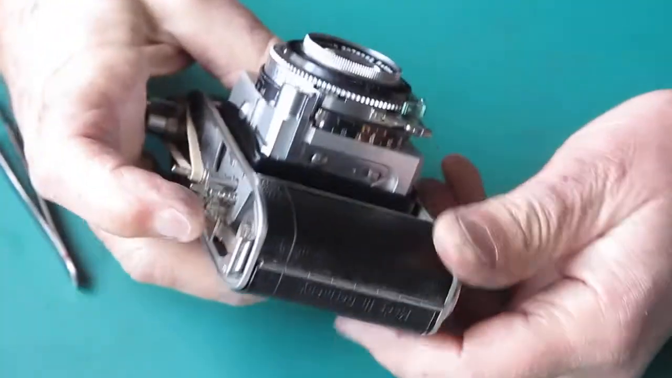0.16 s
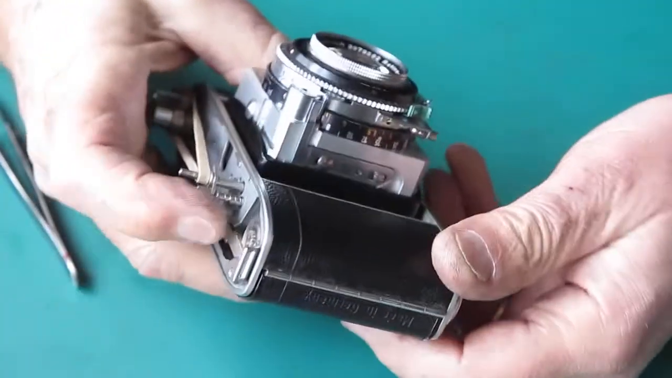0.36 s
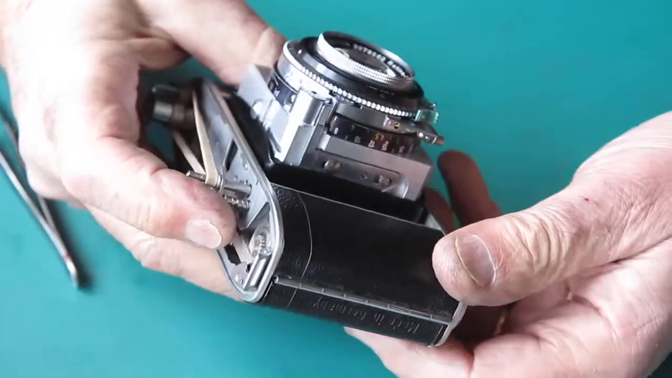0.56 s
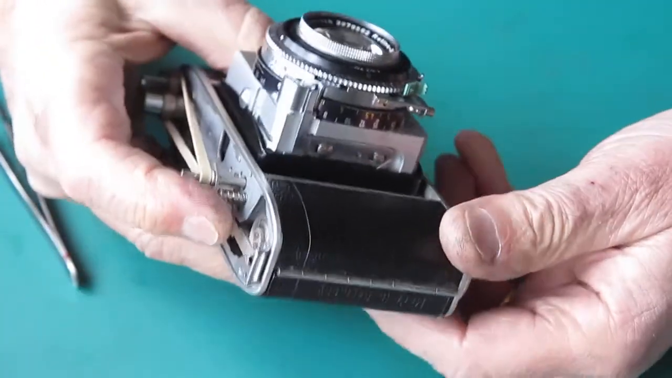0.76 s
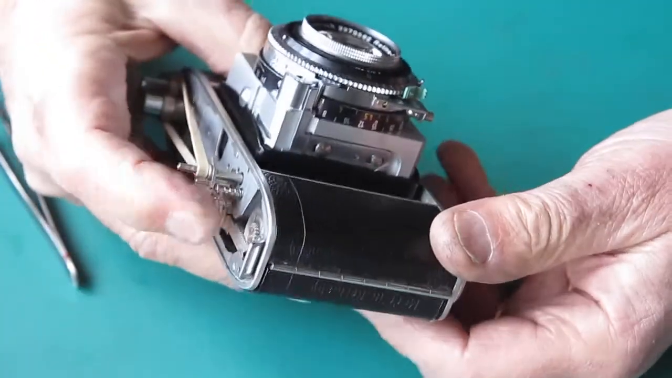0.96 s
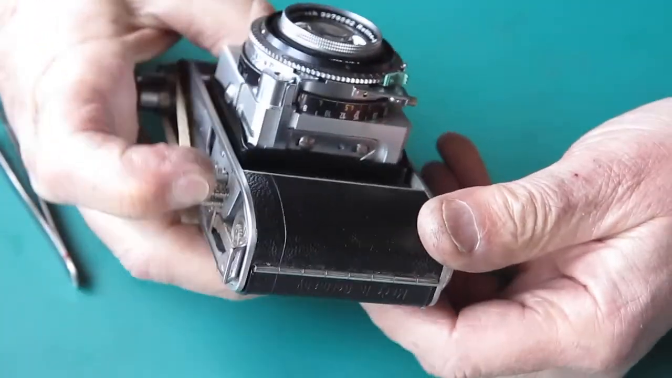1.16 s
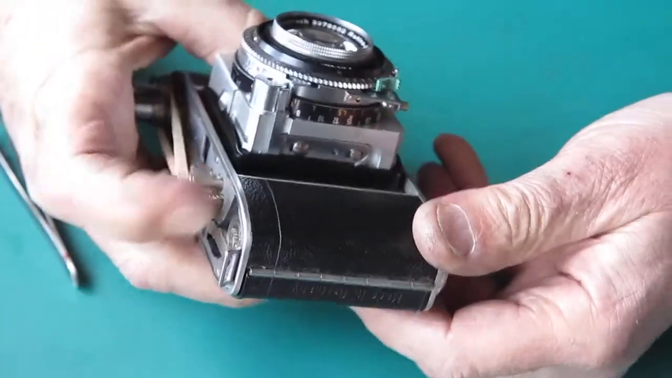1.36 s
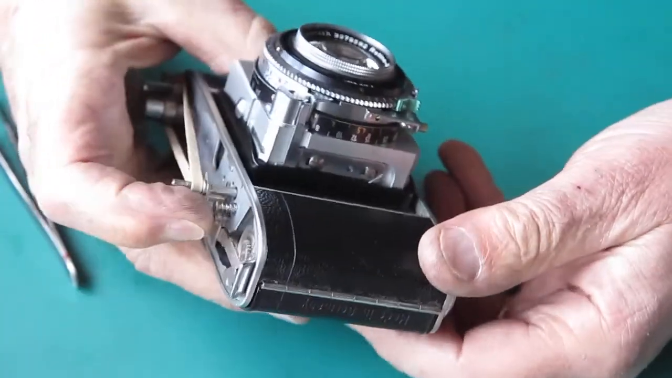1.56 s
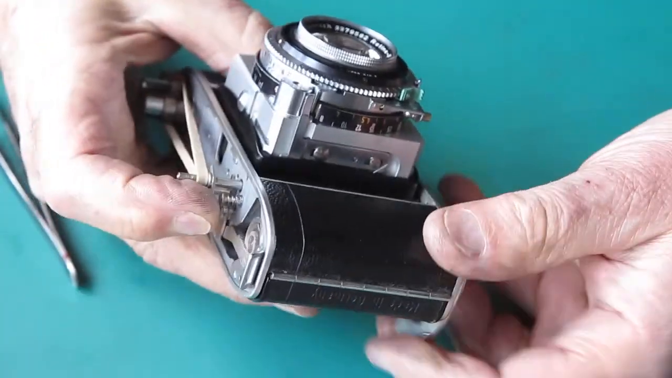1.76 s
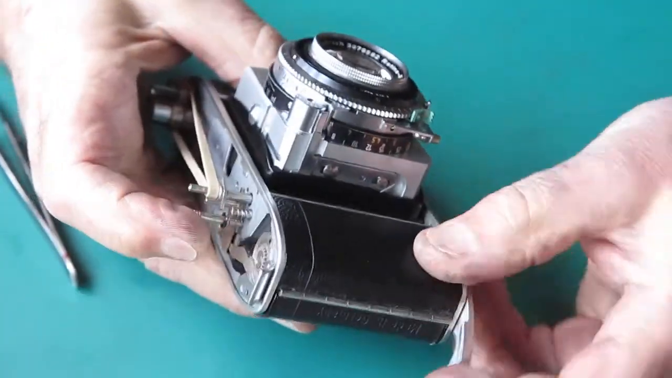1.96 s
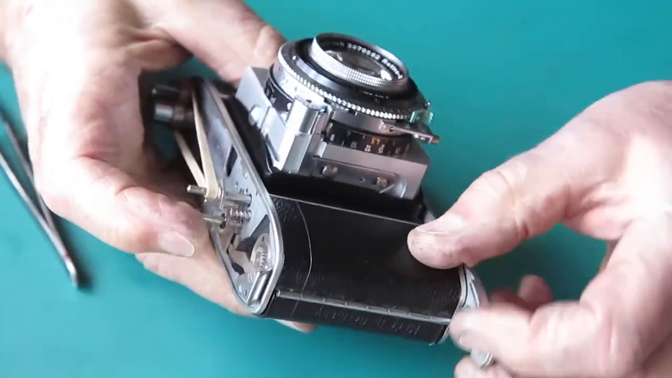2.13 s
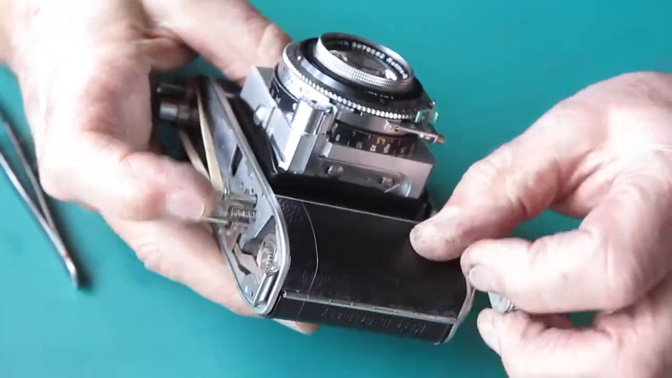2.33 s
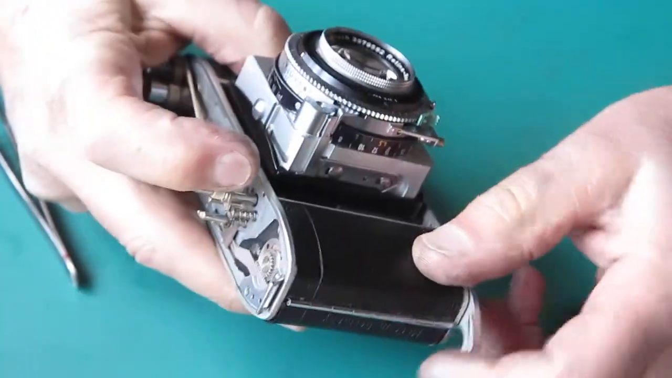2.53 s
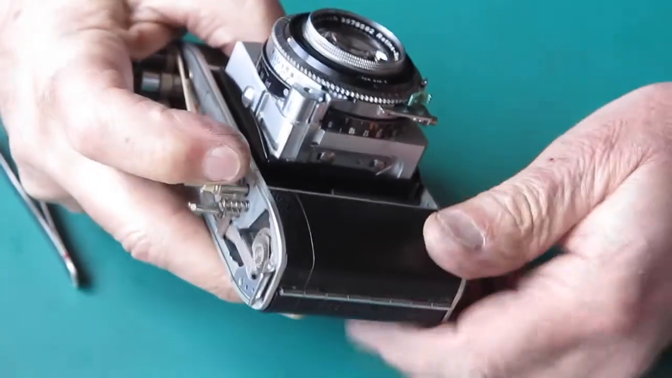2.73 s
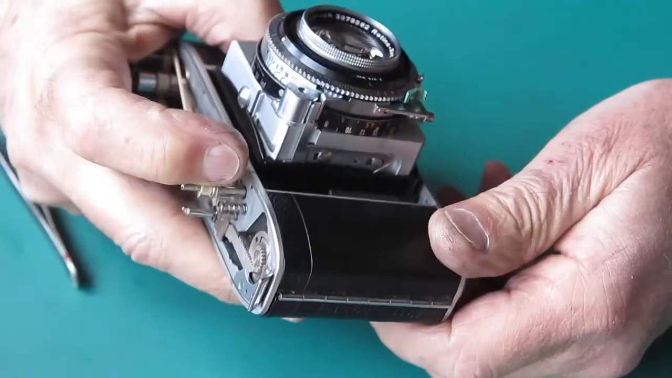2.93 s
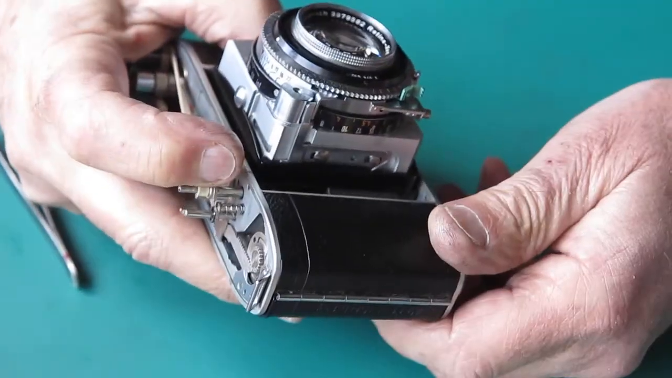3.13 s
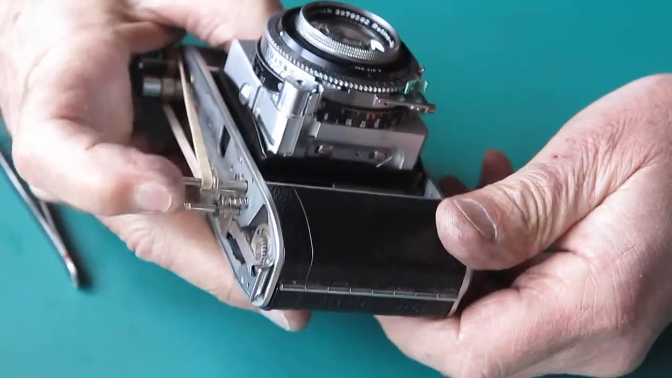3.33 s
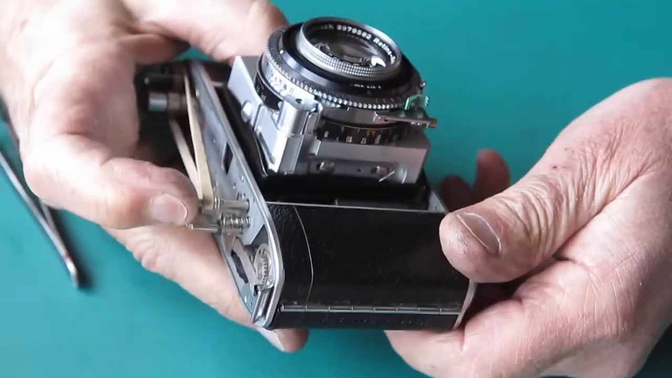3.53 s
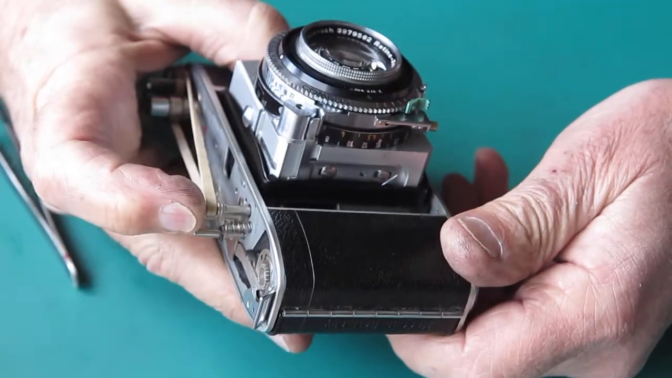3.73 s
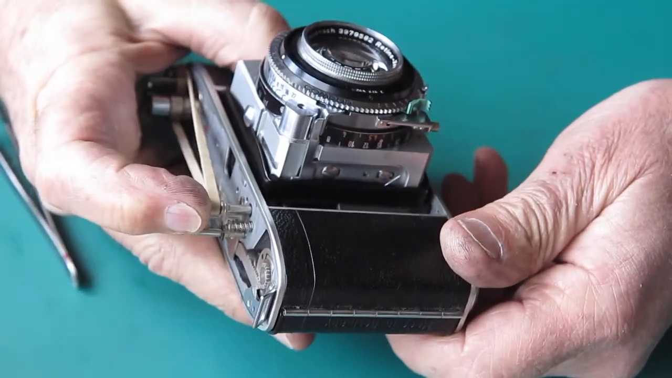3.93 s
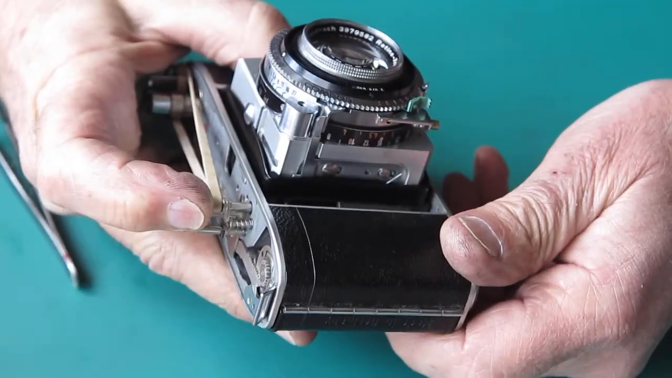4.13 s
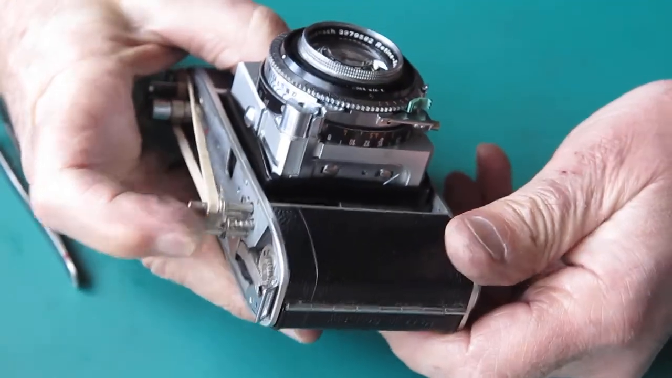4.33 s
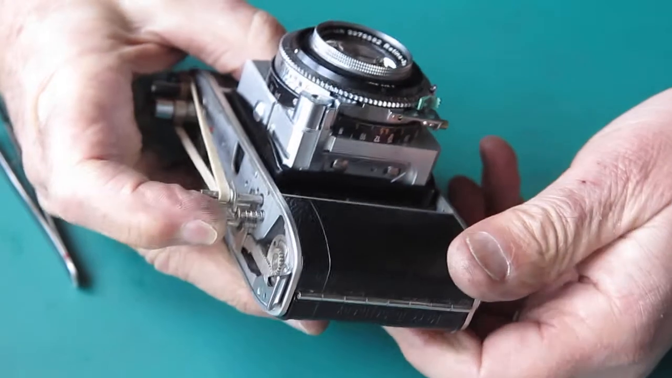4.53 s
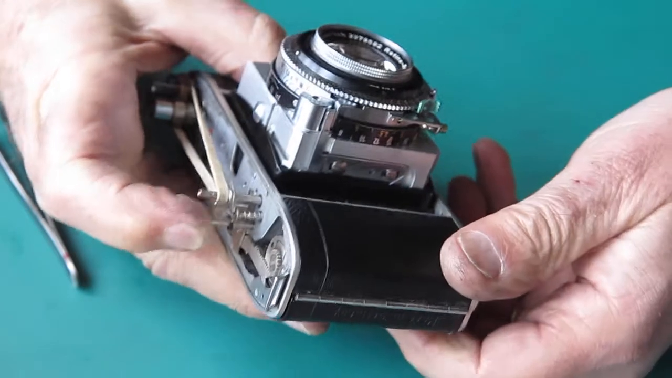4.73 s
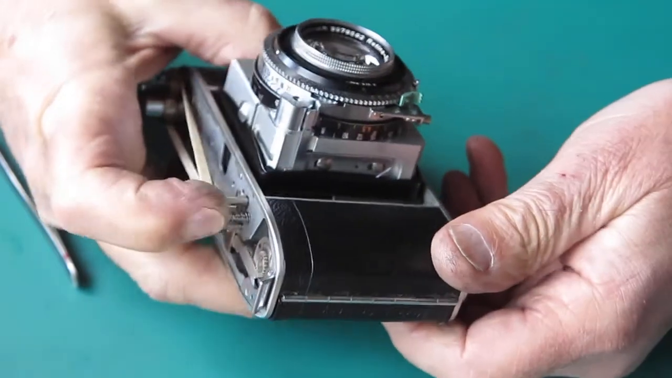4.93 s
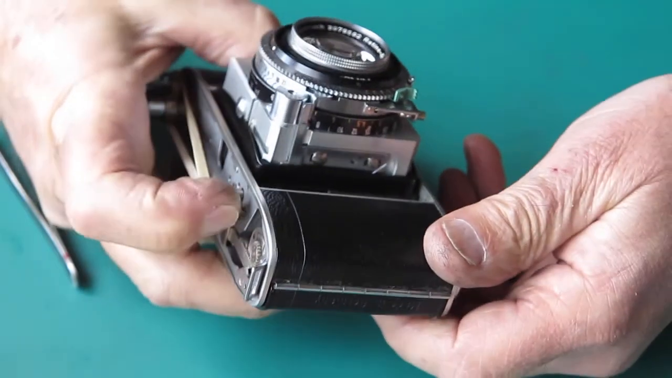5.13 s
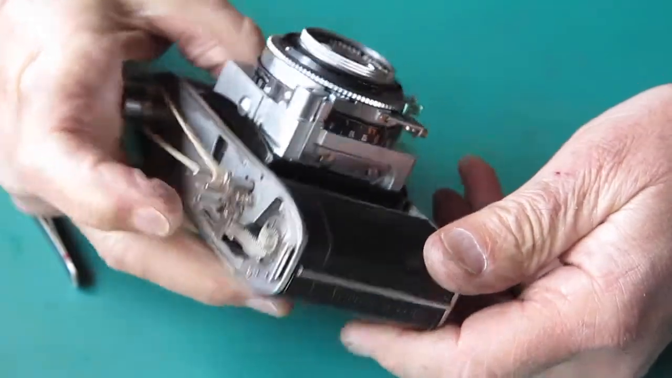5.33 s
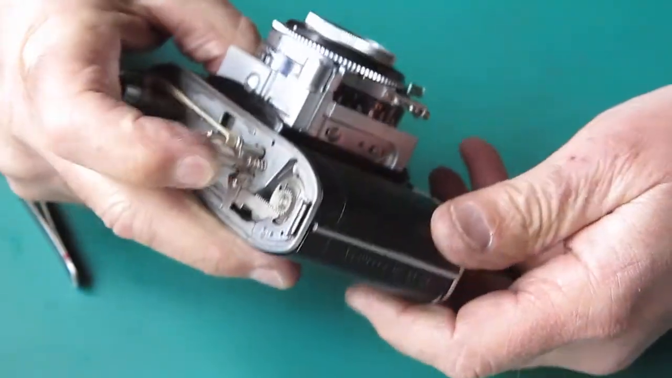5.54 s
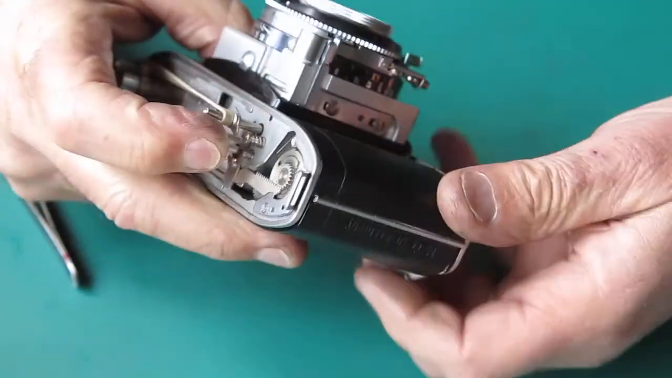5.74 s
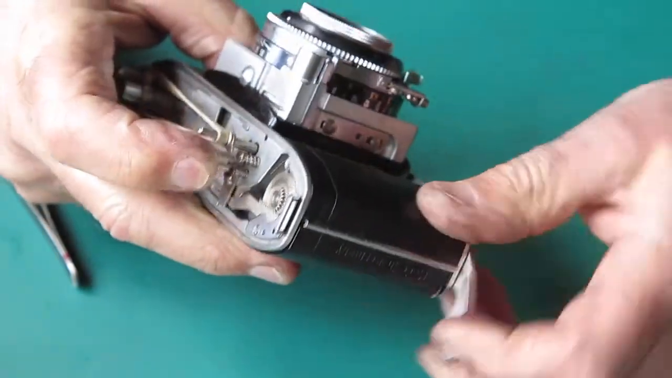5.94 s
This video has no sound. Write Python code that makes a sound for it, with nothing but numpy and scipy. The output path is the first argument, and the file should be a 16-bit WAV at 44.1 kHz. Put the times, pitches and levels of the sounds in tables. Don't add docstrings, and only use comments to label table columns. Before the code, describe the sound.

Small metal camera worked by hand in a quiet workshop: light clicks, a ratcheting lever wind, springy snaps, one sharp shutter release, then winding again.

```python
import sys
import numpy as np
from scipy import signal
from scipy.fft import rfft, irfft
from scipy.io import wavfile
from scipy.ndimage import uniform_filter1d

SR = 44100
rng = np.random.default_rng(int(sys.argv[2]) if len(sys.argv) > 2 else 0)


def output_pcm(signal):
    pcm = np.clip(np.atleast_2d(signal).T, -1, 1) * 32767
    wavfile.write(sys.argv[1], SR, np.round(pcm).astype(np.int16))


def invert_db(x):
    u = np.asarray(x, float) / 20
    return 10 ** u


N = 268791


def shape(table, hz):
    point_hz, value = np.transpose(table)
    return np.interp(np.log(np.maximum(hz, 1)), np.log(point_hz), value)


def level(x, db):
    return x * invert_db(db) / np.sqrt(np.mean(x ** 2))


def coloured(gain, channels=2):
    return irfft(rfft(rng.standard_normal((channels, N))) * gain, N)


def walk(rate_hz):
    hold = int(SR / rate_hz)
    steps = np.repeat(rng.standard_normal(N // hold + 1), hold)
    return 0.75 * uniform_filter1d(uniform_filter1d(steps, hold), hold)[:N]


def add(out, s, sound):
    i = int(s * SR)
    out[:, i:i + sound.shape[1]] += sound[:, :N - i]


def background():
    # (frequency [Hz], density [dB per Hz])
    rumble_spectrum = [(12, -31), (20, -14.5), (139, -3), (213, -9.5), (276, -9.5), (398, -9.5),
                       (467, -12.5), (714, -16), (910, -17), (987, -18), (1050, -17.5), (1160, -19.5),
                       (2500, -39.5), (3250, -56), (5500, -120)]
    # (frequency [Hz], density [dB per Hz])
    hiss_spectrum = [(880, -11.5), (1500, -1.5), (1740, -1.5), (1880, -2.5), (2060, -1.5), (7320, -5),
                     (11700, -20), (14600, -34), (16000, -43.5)]
    # (frequency [Hz], correlation [-1..1])
    likeness = [(30, 0.8), (90, 0.96), (170, 0.4), (300, -0.075), (550, -0.42), (750, -0.24), (1000, -0.19),
                (1500, 0.47), (3000, 0.65)]
    # (frequency [Hz], width [Hz], level [dB], steady share [0..1])
    fan_tones = [(120.6, 4.7, -58.5, 0.18), (148.6, 4.5, -58.5, 0.76), (179.3, 19, -65.5, 0.32),
                 (275, 7.1, -66, 0.3), (968, 4.4, -66.5, 0.94), (1127, 5.9, -75.5, 0.11),
                 (1865, 12, -77.5, 0.93)]
    # (time [s], level [dB])
    swell = [(0, 1), (1.5, -1), (2.3, 0.5), (3.5, 1.8), (3.65, -0.5), (3.8, 3), (3.98, 0.5), (4.0, -3.5),
             (4.35, 0.5), (5.65, 2), (6.1, -0.5)]
    t, f = np.arange(N) / SR, np.fft.rfftfreq(N, 1 / SR)
    swell_db = np.interp(t, *np.transpose(swell))
    alike = np.clip(shape(likeness, f), -.98, .98)
    mid_side_gain = invert_db(shape(rumble_spectrum, f)) * np.sqrt([1 + alike, 1 - alike])
    rumble = 0
    for hz in 25 * 2. ** np.arange(7):
        octaves = np.log2(np.maximum(f, 1) / hz)
        bell = np.cos(np.pi / 2 * np.clip(octaves, -1, 1))
        mid, side = coloured(mid_side_gain * bell)
        flicker_db = 2.0 * walk(4.095) + swell_db * min(500 / hz, 1)
        rumble = rumble + invert_db(flicker_db) * np.array([mid + side, mid - side])
    bed = level(rumble, -50) * invert_db(np.array([[1.8], [-1.8]]))
    for hz, width_hz, db, steady in fan_tones:
        tone, stray = coloured(1 / (1 + ((f - hz) / (width_hz / 2)) ** 2))
        tone = (1 - steady) * level(tone, 0) + steady * 1.38 * np.sin(2 * np.pi * hz * t)
        stray = level(stray, 0)
        hum = np.array([tone + 0.2 * stray, 0.94 * tone - 0.37 * stray])
        bed += level(hum, db) * invert_db(.5 * swell_db)
    hiss = level(coloured(invert_db(shape(hiss_spectrum, f))), -57)
    return bed + hiss


def recorder_gain_db(t):
    # (time [s], lasting drop [dB], short dip [dB], hold before creep [s])
    drops = [
        (2.27, 2.5, 2.5, 0.0099),
        (2.78, 2.5, -1.5, .02),
        (3.988, 8.5, -0.3, 0.54),
    ]
    start_db, creep_db_per_s, dip_return_s = -12, 4.5, 0.55
    gain_db = start_db + creep_db_per_s * t
    for s, db, dip_db, hold_s in drops:
        since_s = np.maximum(t - s, 0)
        gain_db -= (t > s) * (db + dip_db * np.exp(-since_s / dip_return_s))
        gain_db -= creep_db_per_s * np.minimum(since_s, hold_s)
    return gain_db


def soft_contact(out, s, db, hz, t60_ms, width, push_ms, count=12, size=8000):
    t = np.arange(size) / SR
    jitter, phase = rng.standard_normal((2, count, 1))
    spread = np.linspace(-1.2, 1.6, count)[:, None] + 0.077 * jitter
    mode_hz = hz * np.exp(width * spread)
    modes = invert_db(-5 * spread ** 2) * np.sin(2 * np.pi * mode_hz * t + 1.57 * phase)
    decay = np.exp(-np.log(1000) * t / (t60_ms * 0.0018))
    push = np.minimum(t / (push_ms * 0.00036), 1)
    ring = modes.sum(axis=0) * decay * push
    add(out, s, np.tile(ring * invert_db(db + 1.5), (2, 1)))


def rubs():
    # (time [s], peak [dB], pitch [Hz], t60 [ms], mode spread [log ratio])
    slides = [(.255, -55.5, 1493, 70, 0.63), (1.25, -54.5, 1506, 100, 0.56), (2.2585, -31, 960, 26, 0.067),
              (3.249, -50.5, 1617, 95, 0.63), (3.93, -51, 66, 200, 0.22), (4.0, -54, 2300, 220, 0.0093),
              (4.25, -55.5, 1300, 78, 0.34), (4.35, -54, 284, 70, 0.24), (4.94, -56, 4680, 69, .05),
              (5.245, -54.5, 1136, 170, 0.44), (5.334, -57, 1000, 140, 0.32),
              (5.378, -39.5, 498, 31, 0.205)]
    out = np.zeros((2, N))
    for s, db, hz, t60_ms, width in slides:
        soft_contact(out, s, db, hz, t60_ms, width, push_ms=0.11 * t60_ms)
    return out


def echoes(dry, size=22050):
    # (frequency [Hz], t60 [s], level [dB])
    room = [(1000, 0.29, -2.5), (2500, .25, 2.5), (5110, 0.34, -3.5), (7200, 0.27, 3.5), (9940, 0.23, 0),
            (13700, 0.17, -0.5)]
    # (time [s], level [dB])
    walls = [(.004, 10.5), (.010, 1), (.019, -5), (.031, 1), (.040, -0.5), (.06, -1.5)]
    t, f = np.arange(size) / SR, np.fft.rfftfreq(size, 1 / SR)
    clumps_db = np.repeat(rng.standard_normal((2, size // 50)), 50, axis=1)
    grain = rfft(rng.standard_normal((2, size)) * invert_db(clumps_db))
    alike = np.clip(1.1 - f / 6000, 0, .9)
    grain[1] = alike * grain[0] + np.sqrt(1 - alike ** 2) * grain[1]
    echo = 0
    for k, (_, t60_s, db) in enumerate(room):
        share = shape([(hz, j == k) for j, (hz, _, _) in enumerate(room)], f)
        echo = echo + irfft(grain * share, size) * invert_db(db - 60 * t / t60_s)
    onset = np.clip((t - .0015) / 0.01, 0, 1)
    echo = echo * invert_db(np.interp(t, *np.transpose(walls))) * onset
    mono = dry.mean(axis=0, keepdims=True)
    return invert_db(-32) * signal.fftconvolve(mono, echo, axes=1)[:, :N]


def workshop(dry, pattern_s=.03, patterns=5):
    pattern = np.arange(N) // int(pattern_s * SR) % patterns
    return sum(echoes(dry * uniform_filter1d(1. * (pattern == k), size=64)) for k in range(patterns))


def strikes(rows, thud_db, ring_ms, ping_db, size=2048):
    # (frequency [Hz], level [dB], t60 [ms])
    shell = [(863, -1.5, 17.6), (950, -3, 33.7), (1124, 4.5, 10.4), (1300, 7.5, 8.5), (1448, 1, 15),
             (1800, -2, 16), (2100, 0, 11), (2680, -5.5, 31)]
    # (frequency [Hz], level [dB])
    steel = [(1500, -27), (2400, -12.5), (3100, -7), (4500, 1.5), (5600, -2.5), (7000, -1), (10000, -5),
             (14000, -2.5), (18000, -14.5)]
    out, t, f = np.zeros((2, N)), np.arange(size) / SR, np.fft.rfftfreq(size, 1 / SR)
    u = np.maximum(t - .001, 0)
    shell_hz, shell_db, shell_ms = np.transpose(shell)[:, :, None]
    sign = (-1) ** np.arange(len(shell))[:, None]
    apart = np.clip(f / 16000, 0, .6)
    fade = np.exp(-u / (ring_ms * 0.0021)) + 0.71 * np.exp(-u / 0.00051)
    fade *= np.minimum(u / 0.00033, 1)
    for s, db, large_db, bright_db in rows:
        spurts_db = 3.7 * np.repeat(rng.standard_normal(size // 32), 32) * np.minimum(u / 0.0019, 1)
        rattle = rfft(rng.standard_normal((3, size)) * invert_db(spurts_db) * fade)
        rattle /= np.sqrt(uniform_filter1d(np.abs(rattle) ** 2, size=40, axis=1))
        both, *own = rfft(irfft(rattle, size) * np.minimum(u / 0.00004, 1) * np.exp(-u / 0.024))
        tone_db = shape(steel, f) + (large_db + 9) * np.clip((5800 - f) / 1000, 0, 1)
        tone_db += (bright_db + 12.5) * np.clip((f - 7500) / 2500, 0, 1)
        tone_db += ping_db * np.clip((f - 13000) / 1500, 0, 2)
        stereo = np.sqrt(1 - apart ** 2) * both + apart * np.array(own)
        part = irfft(stereo * invert_db(tone_db), size)
        part /= np.sqrt(np.mean(part[:, :size // 16] ** 2))
        uneven, detune = rng.standard_normal((2, len(shell), 1))
        thud = sign * invert_db(shell_db + 2.5 * uneven) * np.sin(2 * np.pi * shell_hz * (1 + 0.034 * detune) * u)
        thud *= np.exp(-np.log(1000) * u / (shell_ms * 0.0009)) * np.minimum(u / 0.0012, 1)
        row_thud_db = thud_db - 0.47 * (db + 31.5) + 0.27 * (large_db + 8)
        add(out, s - .001, invert_db(db + 4.0) * (part + invert_db(row_thud_db + 5.5) * thud.sum(axis=0)))
    return out


def touches():
    # (time [s], peak [dB], larger-part tone near 4 kHz [dB])
    taps = [(0.29, -56, -6), (0.3125, -51.5, -7), (.398, -58, -11), (0.962, -52.5, -6), (1.553, -63, -15),
            (1.67, -57, 0), (2.4747, -55, -9), (3.2476, -51.5, -3), (4.4426, -60, -12), (4.4887, -62.5, -5),
            (4.9496, -64, 8), (5.0508, -53, -2), (5.184, -45.5, -2), (5.3748, -51, -2), (5.4284, -53.5, 23),
            (5.465, -52, -1), (5.534, -47.5, -4), (5.582, -49.5, -14)]
    bright_db = -13
    rows = [(s, db, large_db, bright_db) for s, db, large_db in taps]
    return strikes(rows, thud_db=-17.5, ring_ms=2, ping_db=-7)


def button():
    # (time [s], peak [dB], larger-part tone [dB], brightness [dB])
    hits = [(1.0049, -34, -17, -10), (1.0122, -47, -27, -15), (1.0152, -41.5, -7, -14),
            (1.289, -33, -14, -3), (1.2918, -27, -9.5, -4.5), (1.3635, -35.5, -9, -7.5),
            (1.366, -45, -9, -9), (1.3737, -47, -28, -19), (1.5429, -45.5, -11, -11),
            (3.9848, -18.5, -8, -6.5), (3.9876, -14.5, -9.5, -9), (3.9912, -19.5, -7, -3),
            (3.9943, -23, -12, -7), (4.0017, -42, -9, -7), (4.2528, -44.5, -7.5, -9.5),
            (5.0852, -31, -12, -1), (5.0905, -27, -13, -1.5), (5.096, -36, -13, -3),
            (5.101, -36.5, -10, -6), (5.2, -33, -9, -9), (5.2103, -43, -14, -17)]
    return strikes(hits, thud_db=-18.5, ring_ms=1.62, ping_db=-17)


def rings(size=4096):
    # (time [s], pitch [Hz], peak [dB], t60 [ms])
    lone = [(1.0052, 4660, -35, 27), (1.0052, 7150, -39, 20), (1.0052, 3500, -33, 12),
            (1.0155, 4500, -38, 20), (1.291, 5770, -37, 32), (1.292, 4700, -37, 15), (1.292, 9200, -31, 25),
            (1.3637, 3650, -39, 20), (1.3637, 6940, -43, 25), (2.2648, 4440, -11.5, 14),
            (2.265, 6200, -14, 29), (2.2648, 8410, -17.5, 22), (2.2645, 9900, -12, 40),
            (2.2645, 11000, -22, 25), (2.3, 3200, -45, 18), (2.487, 7100, -26.5, 36), (3.9, 8330, -34, 25),
            (2.5807, 5270, -31, 22), (2.5807, 6100, -34, 25), (2.5815, 8400, -24, 22),
            (2.5804, 9100, -29, 25), (2.6775, 3800, -29, 18), (2.6772, 5600, -34, 20),
            (2.6775, 7010, -30, 15), (2.6775, 8400, -18, 20), (2.7548, 4300, -20, 25),
            (2.7548, 6030, -31, 20), (2.754, 7200, -27, 25), (2.7548, 8400, -20, 25), (2.78, 2760, -19, 14),
            (2.7862, 6090, -22, 70), (2.786, 6730, -25, 30), (2.79, 10400, -26, 37),
            (2.7995, 4170, -31, 34), (3.988, 5200, -15.5, 32), (3.987, 6800, -30, 45),
            (3.988, 11000, -36, 50), (3.985, 8400, -21.5, 20), (3.988, 10600, -27, 30),
            (4.253, 7170, -48, 30), (4, 5100, -46, 25), (5.911, 6900, -37, 30), (5.2, 3300, -31, 15),
            (5.965, 5700, -33, 25), (5.984, 5200, -29, 25), (5.846, 2650, -37.5, 21.3)]
    strike_s = [1.0125, 1.0155, 1.543, 1.795, 1.858, 1.975, 2.118, 2.4885, 2.581, 2.6775, 4.7166, 4.744,
                5.0855, 5.0905, 5.1845, 5.2, 5.582, 5.755, 5.846, 5.911, 5.965, 6.061]
    # (pitch [Hz], peak [dB], t60 [ms])
    strike_modes = [
        [(7200, -47, 12)],
        [(7300, -46, 14)],
        [(6200, -46, 15), (7280, -50, 20), (3200, -44, 12)],
        [(4300, -35, 15), (5250, -41, 15), (2750, -40, 12)],
        [(5040, -33, 22), (7250, -43, 20), (8250, -42, 15)],
        [(3930, -34, 15), (5750, -41, 15), (7250, -45, 20), (11400, -36, 15)],
        [(3900, -43, 15), (7260, -48, 20)],
        [(7000, -38, 18)],
        [(6250, -34, 20), (7250, -36, 22)],
        [(7300, -32, 20)],
        [(7300, -48, 25), (3250, -52, 12), (12000, -43, 10)],
        [(4250, -32, 24), (6160, -35, 20), (7750, -39, 25)],
        [(2730, -42, 13)],
        [(4300, -31, 24), (5540, -33, 20), (7250, -40, 25)],
        [(2800, -47, 15), (7150, -57, 20)],
        [(3880, -40, 19), (5170, -39, 15), (7540, -45, 20)],
        [(6000, -45, 15), (7100, -54, 15)],
        [(7100, -48, 15)],
        [(6540, -36, 20), (5360, -40, 15)],
        [(6300, -27, 25)],
        [(7250, -33, 20), (6000, -36, 15)],
        [(7250, -43, 20), (6250, -42, 15)],
    ]
    out, t = np.zeros((2, N)), np.arange(size) / SR
    modes = list(lone)
    for s, struck in zip(strike_s, strike_modes):
        modes += [(s, *mode) for mode in struck]
    for s, hz, db, t60_ms in modes:
        split, turn = rng.standard_normal(2)
        twin_hz = hz * (1 + 0.009 * split)
        pair = np.sin(2 * np.pi * hz * t) + 0.91 * np.sin(2 * np.pi * twin_hz * t + turn)
        decay = invert_db(db - 60 * t / (t60_ms / 1000))
        add(out, s, np.tile(decay * pair * np.minimum(t / 0.00027, 1), (2, 1)))
    return out


def knocks():
    # (time [s], peak [dB], pitch [Hz], mode spread [log ratio])
    blows = [(1.006, -53.5, 1110, .15), (1.371, -50, 897, 0.11), (1.371, -51, 1990, 0.074),
             (4.744, -55, 1000, 0.24), (5.092, -48, 900, 0.18), (2.243, -42, 380, 0.21),
             (3.988, -32, 2000, 0.046), (3.988, -32.5, 1595, 0.048), (3.9915, -31, 1020, 0.054),
             (5.376, -49, 1300, 0.35), (5.384, -52, 1000, .15), (5.386, -50, 613, 0.35),
             (5.394, -49, 500, 0.43), (5.4145, -49, 615, 0.3), (5.43, -56, 700, 0.36),
             (5.431, -60, 1800, 0.116), (5.44, -53, 2100, 0.24), (5.47, -50, 784, 0.385),
             (5.505, -56, 950, 0.37), (5.524, -57, 1000, 0.45), (5.585, -51.5, 950, 0.38)]
    push_cycles = 1.6
    out = np.zeros((2, N))
    for s, db, hz, width in blows:
        soft_contact(out, s, db, hz, 29.5, width, push_ms=push_cycles * 1000 / hz)
    return out


def gears(ticks_per_s=2500):
    # (time [s], level [dB])
    wind = [
        [(1.68, -82), (1.75, -61), (1.8, -57), (1.88, -57), (1.96, -64), (2.02, -50.5), (2.08, -59.5),
         (2.12, -48), (2.18, -58), (2.25, -46.5), (2.27, -56)],
        [(5.75, -57), (5.83, -56), (5.86, -50), (5.9, -51.5), (5.95, -47.5), (6.03, -47), (6.09, -42.5)],
        [(5.2, -70), (5.36, -61.5), (5.47, -73), (5.56, -67), (5.72, -74)],
    ]
    # (frequency [Hz], width [Hz], level [dB])
    wheels = [(3240, 1100, -0.5), (4630, 1500, -6), (5950, 780, -1.5), (8900, 1500, -6.5), (11500, 2200, 0)]
    t, db, grit = np.arange(N) / SR, np.full(N, -120.), 0
    for s, turn_db in map(np.transpose, wind):
        db = np.maximum(db, np.interp(t, s, turn_db, left=-120, right=-120))
    for hz, width_hz, wheel_db in wheels:
        hit = rng.random(N) < ticks_per_s / len(wheels) / SR
        ticks = hit * invert_db(1.9 * rng.exponential(size=N)) * rng.standard_normal(N)
        rub = ticks + 0.044 * rng.standard_normal((2, N))
        wheel = signal.lfilter(*signal.iirpeak(hz, hz / width_hz, fs=SR), rub)
        grit = grit + level(wheel, wheel_db) + 0.45 * ticks
    return level(grit, 7.5) * invert_db(db + 1.4 * walk(43))


def ratchet():
    # (time [s], peak [dB])
    teeth = [(1.698, -46.5), (1.728, -44.5), (1.75, -44), (1.7698, -44.5), (1.789, -42), (1.806, -42),
             (1.818, -43), (1.8316, -48), (1.847, -44), (1.867, -43), (1.8802, -45), (1.9015, -48),
             (1.931, -45), (1.967, -45), (1.986, -45), (1.9932, -44), (2.016, -43), (2.053, -42),
             (2.093, -44), (2.1106, -43), (2.146, -44), (2.19, -44), (2.2105, -42), (2.2172, -45),
             (2.239, -40), (5.755, -42), (5.778, -39), (5.7932, -39.5), (5.8083, -38.5), (5.824, -43),
             (5.902, -42), (5.856, -46), (5.87, -46), (5.889, -46), (5.922, -43), (5.936, -47),
             (5.961, -44), (5.976, -42), (5.999, -51), (6.0162, -46), (6.025, -48), (6.0418, -46),
             (6.058, -41), (6.0655, -45), (6.082, -46), (6.088, -45)]
    large_db, bright_db = -6.5, -11
    rows = [(s, db, large_db, bright_db) for s, db in teeth]
    return strikes(rows, thud_db=-20.5, ring_ms=1.54, ping_db=-2)


def pawl():
    # (time [s], peak [dB], larger-part tone [dB], brightness [dB])
    notches = [(1.795, -33, -5, -8.5), (1.858, -31, -8.5, -8), (1.9751, -33, -8, -5),
               (2.1176, -34.5, -3, -5), (4.7166, -42.5, -14, -12), (4.7439, -36, -14, -13.5),
               (4.7458, -35, -10, -13), (4.7505, -40.5, -10, -14.5), (5.8424, -38, -16, -13),
               (5.8458, -32, -10, -6), (5.8485, -33, -11, -6), (5.911, -27, -14, -11.5),
               (5.9127, -32, -12, -8), (5.9258, -40, -15, -8), (5.9649, -23.5, -12, -4),
               (5.984, -30.5, -14, -3), (6.0607, -32, -8, -4.5)]
    return strikes(notches, thud_db=-18.5, ring_ms=2.54, ping_db=-1.1)


def stops():
    # (time [s], peak [dB], larger-part tone [dB], brightness [dB])
    hits = [(2.2467, -25.5, -6, -7), (2.2553, -33, -1, -14), (2.2603, -28, -10.5, -5),
            (2.2647, -9.5, -7, 2), (2.2676, -18, -10.5, -12.5), (2.2713, -23, -14, 16.5),
            (2.2745, -37, -13, -5), (2.2955, -30.5, -19, -16), (2.7474, -21, -13, -7.5),
            (2.7495, -28, -6, -7), (2.7546, -13, -14, -8.5), (2.7653, -27, 1, -10), (2.7803, -23.5, 1, -6),
            (2.7858, -15.5, -16, -8), (2.7902, -11, -5, 2), (2.7965, -19, -8.5, -6),
            (2.7992, -18.5, -12, -16.5), (2.8045, -26, -7, -5)]
    return strikes(hits, thud_db=-16.5, ring_ms=2.1, ping_db=3.4)


def return_spring():
    # (time [s], peak [dB], larger-part tone [dB], brightness [dB])
    snaps = [(2.488, -22, -16.5, -9.5), (2.4892, -40, -10, 6), (2.4939, -63, -22.5, -18),
             (2.5807, -14.5, -14, -4.5), (2.5873, -24.5, -21, -8), (2.592, -31, -27, -19),
             (2.6775, -15, -15.5, -7), (2.688, -29, -11, -6)]
    return strikes(snaps, thud_db=-17, ring_ms=1.03, ping_db=4.1)


def port(x, table, lag_s, size=1024):
    f = np.fft.rfftfreq(size, 1 / SR)
    cepstrum = irfft(np.log(invert_db(shape(table, f))), size)
    cepstrum[1:size // 2] *= 2
    cepstrum[size // 2 + 1:] = 0
    response = np.exp(rfft(cepstrum) - 2j * np.pi * f * lag_s)
    return signal.fftconvolve(x, irfft(response, size)[:size // 2])[:N]


def microphone(sound):
    # (frequency [Hz], gain [dB])
    left = [(300, -7), (1000, -7.5), (2500, -11.5), (4500, -11.5), (7000, -10.5), (10500, -10),
            (12500, -17), (14300, -36), (15200, -38), (16000, -47), (16600, -68), (17500, -90)]
    # (frequency [Hz], gain [dB])
    right = [(300, -4), (1000, -8.5), (2500, -11.5), (4500, -11), (6000, -2.5), (6600, -3), (7250, 2.5),
             (7700, -2.5), (8400, -5.5), (10000, -19.5), (12500, -39.5), (14300, -52.5), (15500, -66),
             (16000, -85), (17500, -100)]
    return np.array([port(sound[0], left, lag_s=6e-5), port(sound[1], right, lag_s=4.5e-5)])


def scene():
    metal = touches() + button() + gears() + ratchet() + pawl() + stops() + return_spring()
    dull, modes = rubs() + knocks(), rings()
    to_walls = metal + invert_db(-3.5) * dull + invert_db(-8) * modes
    camera = metal + dull + modes + workshop(to_walls)
    gain_db = recorder_gain_db(np.arange(N) / SR) + 1.0
    return microphone(camera) + background() * invert_db(gain_db)


def top_cut(x):
    return signal.sosfilt(signal.butter(12, 16530, fs=SR, output="sos"), x)


def record(dry):
    return top_cut(dry)


dry = scene()
out = record(dry)
output_pcm(out)
```